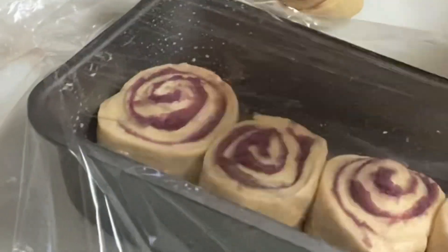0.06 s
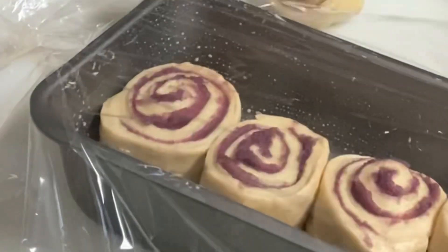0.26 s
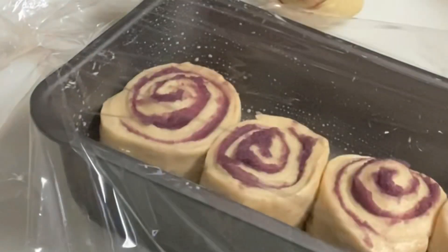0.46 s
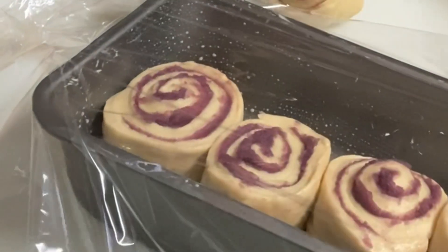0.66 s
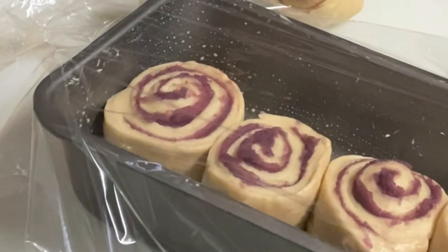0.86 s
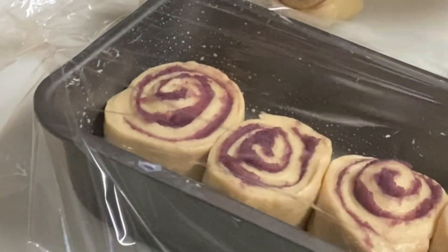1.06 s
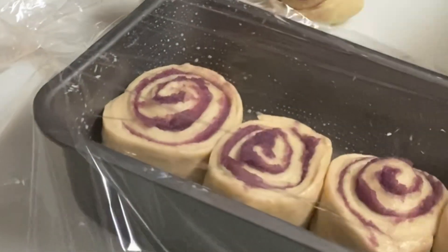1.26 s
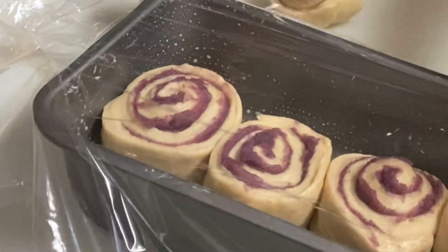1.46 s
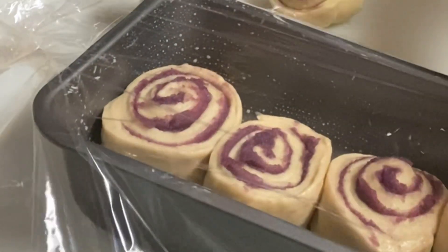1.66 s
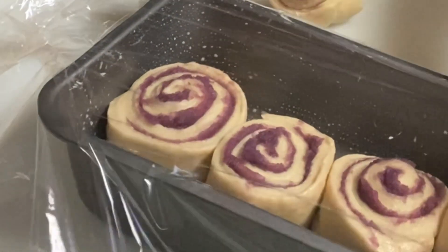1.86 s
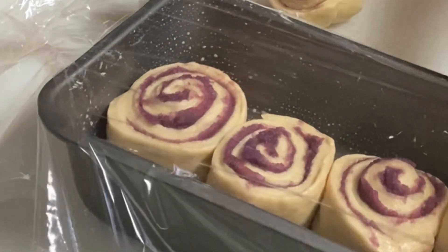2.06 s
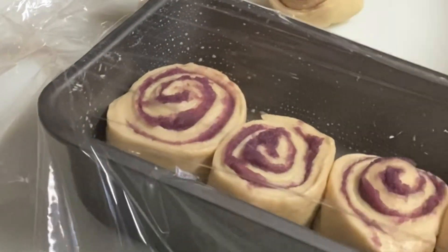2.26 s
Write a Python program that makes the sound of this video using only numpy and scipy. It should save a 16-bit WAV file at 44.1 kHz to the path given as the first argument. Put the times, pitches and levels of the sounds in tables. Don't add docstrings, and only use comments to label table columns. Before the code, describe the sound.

Plastic cling film crinkles over a metal baking pan, heard close in a quiet kitchen. Brisk rustling and rubbing start at once; a hard knock at 0.2 s rings the pan and booms through the counter, with a softer one at 0.3. Rustling swells near 0.6, then a loud, sharp snap at 0.74 rebounds. Sparse ticks follow, with renewed crinkling around 1.7-1.9, over low fridge hum.

```python
import sys
import numpy as np
from scipy import signal
from scipy.fft import rfft, irfft
from scipy.io import wavfile
from scipy.ndimage import uniform_filter1d

SR = 44100
rng = np.random.default_rng(int(sys.argv[2]) if len(sys.argv) > 2 else 0)


def transcribe(u):
    v = np.clip(np.atleast_2d(u).T, -1, 1)
    q = np.round(v * 32767).astype(np.int16)
    wavfile.write(sys.argv[1], SR, q)


def nominal_scale(level):
    x = np.asarray(level, float) / 20
    return 10 ** x


N = 101429

# start_s, length_s, rustle_db, rub_re_rustle_db
STROKES = [(0, 0.018, -60, 1.5), (0.034, 0.045, -59, 0), (0.066, 0.025, -55, 2), (.11, 0.018, -70.5, 11.5),
           (0.146, 0.068, -60.5, -2.5), (0.223, 0.098, -67, 8), (.33, 0.047, -69, 2.5),
           (0.403, 0.092, -76.5, 3), (0.468, 0.092, -67, -1.5), (0.526, 0.078, -67.5, -1),
           (0.578, .03, -63, -2.5), (0.608, 0.027, -58, -1.5), (0.654, 0.15, -58.5, -5),
           (0.771, 0.076, -59.5, -0.5), (.87, 0.068, -65.5, -2), (0.949, 0.12, -74, 1),
           (1.03, 0.072, -70.5, -4.5), (1.109, 0.16, -75, 0), (1.216, 0.022, -70.5, -7.5),
           (1.28, .1, -79, -6), (1.53, 0.014, -73.5, -2.5), (1.669, 0.075, -62, -1.5),
           (1.739, 0.16, -67.5, -4.5), (1.875, 0.088, -69, -3.5), (2.017, 0.04, -74, -7),
           (2.089, 0.022, -73.5, -3), (2.236, 0.048, -69.5, -6.5)]
# freq_hz, density_db_per_hz
FILM_SPECTRUM = [(600, -30), (1500, -7), (2600, -0.5), (5000, -4), (8300, -5), (12500, -8.5),
                 (14300, -10.5), (15600, -30)]
# freq_hz, density_db_per_hz
RUB_SPECTRUM = [(200, -28), (450, -4), (800, 0.5), (1500, -1), (2200, -10.5), (3500, -29)]
# start_s, length_s, level_db,
# pitch_hz
SINGS = [(0, .04, -57, 650), (.727, .012, -54, 3300), (0, .03, -50, 200), (.63, .05, -55, 270),
         (.64, .04, -60, 500), (.198, .012, -58, 900), (0.049, 0.059, -54.5, 775), (.609, .03, -60, 680),
         (.61, .03, -60, 900), (.605, .05, -52, 190), (.745, .06, -49, 200), (.745, .025, -53, 490),
         (.79, .04, -54, 460), (.745, .02, -57, 690), (.037, .012, -60, 1250), (1.685, .05, -67, 650),
         (.22, .035, -47, 550), (0.674, .015, -61, 3000), (0.772, 0.062, -55.5, 1045),
         (0.911, 0.041, -70.5, 1396), (1.208, .02, -58, 620), (1.682, 0.065, -62, 1230),
         (1.698, 0.044, -64, 1530), (1.722, 0.037, -65.5, 4900), (1.685, 0.052, -65, 7500),
         (1.777, 0.022, -70, 1200), (1.877, .012, -55, 660), (1.919, 0.039, -68.5, 400)]
# pitch_hz, rms_db
HUM_LINES = [(26.9, -70), (59.2, -59), (118.4, -56), (242.2, -68.5), (360.7, -103), (479.1, -84),
             (839.8, -91.5)]
# freq_hz, density_db_per_hz
AIR_SPECTRUM = [(20, 4), (45, -6.5), (68, 5.5), (95, -7), (300, -30), (900, -44.5), (2500, -48),
                (14000, -57)]
# start_s, peak_db, pitch_hz
TICKS = [(0.0416, -44.5, 8100), (0.0708, -35.5, 3700), (0.1486, -48, 9000), (0.2097, -28, 4400),
         (0.2564, -42, 3080), (0.3082, -44, 3900), (0.3633, -41, 7900), (0.4704, -53, 7760),
         (0.7407, -17, 3100), (1.0328, -46.5, 8000), (1.0838, -49, 4600), (1.2225, -57, 12000),
         (1.2351, -47, 11500), (1.3092, -46, 9800), (1.3833, -48.5, 3810), (1.4587, -57, 9500),
         (1.5119, -59, 7760), (1.6744, -58, 7630), (1.764, -43.5, 7940), (1.807, -57.5, 8340),
         (1.8233, -39.5, 9000), (1.8514, -49, 8510), (1.879, -42.5, 8600), (1.9207, -42.5, 12400),
         (2.036, -53, 12500), (2.049, -46, 8820), (2.0888, -49, 8610), (2.2108, -55, 8460),
         (2.2443, -48, 3800), (2.279, -46.5, 8700)]
# start_s, peak_db, pitch_hz
MORE_TICKS = [(0.8992, -47, 4500), (0.9487, -66.5, 3480), (1.287, -58, 8340), (1.3324, -51, 3660),
              (1.549, -57, 7330), (1.611, -60, 9000), (1.198, -59, 10500), (1.632, -63, 9000),
              (2.12, -62, 9000), (1.213, -56, 2600), (.757, -38, 3600), (.762, -40, 2000),
              (1.862, -47, 8400), (1.921, -51, 3600), (1.707, -49, 7340), (1.742, -43, 8400),
              (.04, -46, 1300), (1.8986, -50, 8150), (1.9483, -48, 8060), (2.0175, -60, 12130),
              (2.1016, -53, 9500), (2.16, -58, 12300), (2.2254, -61, 12500), (2.239, -55, 3480)]
# start_s, peak_db, counter_boom_db, low_boom_db
KNOCKS = [(0.058, -50, -63, -54), (0.2085, -20.5, -20.5, -28), (0.3065, -31, -32, -34.5),
          (0.364, -48, -39.5, -84), (0.61, -52, -42.5, -64), (0.637, -52, -90, -34.5),
          (0.74, -46, -41, -29.5), (0.773, -52, -56, -37), (0.809, -50, -62, -37),
          (1.208, -51, -44.5, -47.5), (1.24, -52.5, -51, -40.5), (1.873, -52, -43, -50.5)]
# pitch_hz, level_db, t60_s
PAN_MODES = [(250, 1.5, .09), (400, -6, .13), (550, -2, 0.15), (677, -15.5, 0.13), (905, -9, .12),
             (1070, -12, 0.15), (1190, -12, 0.063)]
# centre_hz, level_db, t60_s
THUD_BANDS = [(176, -4, 0.5), (266, -10.5, 0.25), (435, -6, 0.23), (725, -15.5, 0.15), (1060, -12, 0.1),
              (2236, -9, 0.072), (3600, -9.5, 0.11)]
# freq_hz, density_db_per_hz
SNAP_SPECTRUM = [(500, -31), (1000, 1.5), (1700, 8), (3000, 16), (4800, 0.5), (8000, -7), (9400, -13),
                 (14000, -44)]
# pitch_hz, level_db, t60_s
RIM_MODES = [(985, 17.5, 0.026), (1000, 4, 0.23), (1123, 2.5, .12), (1630, 20, .025), (1895, 4, 0.17),
             (2434, -2, 0.14), (3160, 5, .05), (3570, 1.5, .09), (3740, 10, 0.076), (4070, 4.5, .11),
             (4450, 8, 0.055), (4944, 10, .025), (7400, 0.5, 0.037), (8200, 4, .025)]
# low_hz, high_hz
SIDE_GAPS_HZ = [(7650, 8700), (12300, 13600)]

STROKE_ATTACK_S, STROKE_RELEASE_T60_S = .012, .13
GRAINS_PER_S, SMOOTH_SHARE, CLUMP_DB = 4600, 1.4, 1.5
RUSTLE_SIDE_DB, PATCHY_DB = .9, 2
SING_Q, SING_FADE_S, SING_SIDE_DB = 5.1, .007, -4
HUM_WOBBLE_DB, AIR_DB, AIR_APART = 1.5, -54, .49
TICK_T60_S, TICK_TAIL_T60_S, TICK_TAIL_DB = .007, .04, -22
TICK_Q, TICK_WIDE_DB, TICK_TRIM_DB, TICK_DIFFUSE = 2.5, -6, .5, .65
FILM_LAG_S, NEAR_LAG_S, NEAR_BELOW_HZ = -.00014, .00024, 5000
PAN_TRIM_DB, PAN_DAMPING, THUD_DB = -6, .9, -12
PAN_LAG_S, PAN_SPREAD = .0001, .6
BOOM_HZ, BOOM_T60_S, LOW_HZ, LOW_T60_S, SWELL_S = 124.4, .38, 68.93, .23, .011
DAMPED_S, DAMPED_DB = .277, -6
LATE_S_AT_250_HZ = .0115
SNAP_S, SNAP_DB, SNAP_T60_S = .7413, -14, .017
SNAP_TAIL_DB, SNAP_TAIL_T60_S, TAIL_GRAIN_DB = -23.5, .25, 3.5
CREAK_S, CREAK_DB, REBOUND_S, REBOUND_DB = .014, -17, .7725, -24
RIM_DB, CRACK_DB, RIM_LAG_S, SNAP_DIFFUSE = -43.5, -8, -.000175, .45
BASS_LEFT_DB = .8
MID_GAPS_HZ, GAP_LEAK_DB = [(9570, 11290)], -29
CUTOFF_HZ = 16600

TIME_S = np.arange(N) / SR
BINS_HZ = np.arange(N // 2 + 1) * SR / N
MID_TO_PORTS, SIDE_TO_PORTS = np.array([[1], [1]]), np.array([[1], [-1]])


def unit(x):
    return x / np.sqrt(np.mean(x ** 2) + 1e-20)


def butter(x, order, hz, kind="low"):
    return signal.sosfilt(signal.butter(order, hz, kind, fs=SR, output="sos"), x)


def colour(x, points):
    hz, db = np.transpose(points)
    gain_db = np.interp(np.log(BINS_HZ + 1), np.log(hz), db, left=-90)
    return irfft(rfft(x) * nominal_scale(gain_db), N)


def drift(rate_hz):
    r = np.exp(-2 * np.pi * rate_hz / SR)
    wander = signal.lfilter([1], [1, -2 * r, r * r], rng.standard_normal(2 * N))
    return unit(wander[N:])


def decay(t, t60_s):
    return nominal_scale(-60 * t / t60_s)


def dying(start_s, t60_s):
    t = TIME_S - start_s
    return (t >= 0) * decay(np.maximum(t, 0), t60_s)


def ring(x, hz, t60_s):
    r, w = decay(1 / SR, t60_s), 2 * np.pi * hz / SR
    return signal.lfilter([0, np.sin(w)], [1, -2 * r * np.cos(w), r * r], x + 1e-18)


def pair(x, lag_s, diffuse):
    lagged = irfft(rfft(x) * np.exp(-2j * np.pi * BINS_HZ * lag_s), N)
    echoes = rng.standard_normal((2, 2000)) * decay(np.arange(2000), 2000)
    echoes[:, :40] = 0
    echoes /= np.sqrt(np.sum(echoes ** 2) / 2)
    wet = signal.fftconvolve(x[None], echoes, axes=1)[:, :N]
    return np.array([lagged, x]) + diffuse * wet


def patchy(x):
    position = np.clip(np.log2((BINS_HZ + 1) / 500) / .7, 0, 7)
    spectrum, out = rfft(x), 0
    for k in range(8):
        band = irfft(spectrum * np.clip(1 - abs(position - k), 0, 1), N)
        out = out + nominal_scale(PATCHY_DB * drift(9.5)) * band
    return out


def rustle():
    film_power, rub_power = 0, 0
    for start_s, length_s, db, rub_db in STROKES:
        attack = np.clip((TIME_S - start_s) / STROKE_ATTACK_S, 0, 1)
        release = decay(np.maximum(TIME_S - start_s - length_s, 0), STROKE_RELEASE_T60_S)
        film_power = film_power + (nominal_scale(db) * attack * release) ** 2
        rub_power = rub_power + (nominal_scale(db + rub_db) * attack * release) ** 2
    grains = unit((rng.random(N) < GRAINS_PER_S / SR) * 1.)
    grain_level = uniform_filter1d(grains, size=9) * 3 + SMOOTH_SHARE
    clump = nominal_scale(CLUMP_DB * drift(39.0))
    film = unit(clump * colour(grain_level * rng.standard_normal((2, N)), FILM_SPECTRUM))
    rub = unit(clump * colour(rng.standard_normal((2, N)), RUB_SPECTRUM))
    mid, side = patchy(np.sqrt(film_power) * film + np.sqrt(rub_power) * rub)
    return mid + nominal_scale(RUSTLE_SIDE_DB) * side * SIDE_TO_PORTS


def sings():
    out = np.zeros((2, N))
    noise = rng.standard_normal((2, N)) * nominal_scale(2.6 * drift(60.))
    for start_s, length_s, db, hz in SINGS:
        span = slice(int(start_s * SR), int((start_s + length_s + 3 * SING_FADE_S) * SR) + 1)
        t = np.arange(span.stop - span.start) / SR
        b, a = signal.iirpeak(hz, SING_Q, SR)
        once = signal.lfilter(b, a, noise[:, span])
        mid, side = unit(signal.lfilter(b, a, once))
        fade_out_s = (length_s - t) / 3 + SING_FADE_S
        shape = np.clip(np.minimum(t, fade_out_s) / SING_FADE_S, 0, 1)
        out[:, span] += nominal_scale(db) * shape * (mid + nominal_scale(SING_SIDE_DB) * side * SIDE_TO_PORTS)
    return out


def fridge():
    lines = 0
    for hz, db in HUM_LINES:
        level = np.sqrt(2) * nominal_scale(db + HUM_WOBBLE_DB * drift(6.5))
        lines = lines + level * np.sin(2 * np.pi * hz * TIME_S + .84 * drift(4.75))
    air = unit(colour(rng.standard_normal((2, N)), AIR_SPECTRUM))
    mid, side = butter(air, 8, 14300)
    side = butter(side, 2, 250, "high")
    return lines + nominal_scale(AIR_DB) * (mid + AIR_APART * side * SIDE_TO_PORTS)


def ticks():
    size = 4000
    out, t = np.zeros((2, N + size)), np.arange(size) / SR
    envelope = decay(t, TICK_T60_S) + nominal_scale(TICK_TAIL_DB) * decay(t, TICK_TAIL_T60_S)
    for start_s, db, hz in list(TICKS) + list(MORE_TICKS):
        if abs(start_s - SNAP_S) <= .004:
            continue
        burst = rng.standard_normal(size) * envelope
        crack = butter(burst, 2, .7 * hz, "high")
        tick = signal.lfilter(*signal.iirpeak(hz, TICK_Q, SR), burst) + nominal_scale(TICK_WIDE_DB) * crack
        row, at = int(hz < NEAR_BELOW_HZ), int(start_s * SR)
        out[row, at:at + size] += nominal_scale(db + TICK_TRIM_DB) * tick / np.abs(tick).max()
    far, near = out[:, :N]
    far = nominal_scale([[-.5], [.5]]) * pair(far, FILM_LAG_S, TICK_DIFFUSE)
    near = nominal_scale([[-1], [1]]) * pair(near, NEAR_LAG_S, TICK_DIFFUSE)
    return far + near


def late(hz):
    return LATE_S_AT_250_HZ * np.sqrt(250 / hz)


def pan_rings(start_s, db):
    out, at = np.zeros(N), (start_s * SR).astype(int)
    for hz, level_db, t60_s in PAN_MODES:
        clicks = np.zeros(N)
        uneven_db = 1.5 * rng.standard_normal(len(start_s))
        clicks[at + int(late(hz) * SR)] = nominal_scale(db + level_db + PAN_TRIM_DB + uneven_db)
        out += ring(clicks, hz, PAN_DAMPING * t60_s)
    return out


def thuds(start_s, db):
    out = np.zeros(N)
    for hz, level_db, t60_s in THUD_BANDS:
        band = unit(butter(rng.standard_normal(N), 2, [hz / 1.29, hz * 1.29], "band"))
        kicks = np.zeros(N)
        kicks[((start_s + late(hz)) * SR).astype(int)] = nominal_scale(db + level_db + THUD_DB)
        out += band * signal.lfilter([1], [1, -decay(1 / SR, t60_s)], kicks + 1e-18)
    return out


def counter_boom(start_s, hz, t60_s, levels_db):
    envelope = np.zeros(N)
    for s, db in zip(start_s, levels_db):
        damping = nominal_scale(DAMPED_DB * (s < DAMPED_S) * (TIME_S > DAMPED_S))
        envelope += nominal_scale(db) * dying(s + late(hz) - SWELL_S / 2, t60_s) * damping
    r = np.exp(-1 / (SWELL_S * SR))
    swell = signal.lfilter([1 - r], [1, -r], envelope)
    return swell * np.sin(2 * np.pi * hz * TIME_S + .5 * drift(9.87))


def knocks():
    start_s, db, boom_db, low_db = np.transpose(KNOCKS)
    pan = pan_rings(start_s, db) + thuds(start_s, db)
    boom = counter_boom(start_s, BOOM_HZ, BOOM_T60_S, boom_db)
    return pan, boom + counter_boom(start_s, LOW_HZ, LOW_T60_S, low_db)


def snap():
    click = np.zeros(N)
    click[int(SNAP_S * SR)] = 1
    click[int(REBOUND_S * SR)] = nominal_scale(REBOUND_DB + 9.5)
    rings = sum(nominal_scale(RIM_DB + db) * ring(click, hz, t60_s) for hz, db, t60_s in RIM_MODES)
    crack = butter(np.roll(click, 20) - np.roll(click, 32), 2, [1000, 6000], "band")
    rings = butter(rings + nominal_scale(CRACK_DB) * crack, 2, 800, "high")
    rise = np.clip(1 - (SNAP_S - TIME_S) / CREAK_S, 0, 1) * (TIME_S < SNAP_S)
    creak = (nominal_scale(CREAK_DB) * rise) ** 2
    tail = nominal_scale(SNAP_TAIL_DB + TAIL_GRAIN_DB * drift(150.)) * dying(SNAP_S, SNAP_TAIL_T60_S)
    rebound = nominal_scale(REBOUND_DB) * dying(REBOUND_S, SNAP_T60_S)
    noise = unit(colour(rng.standard_normal(N), SNAP_SPECTRUM))
    return nominal_scale(SNAP_DB) * noise * (creak + dying(SNAP_S, SNAP_T60_S) + rebound + tail) + rings


def deaf(x, gaps_hz):
    inside = sum((BINS_HZ > low) & (BINS_HZ < high) for low, high in gaps_hz)
    return irfft(rfft(x) * np.where(inside, nominal_scale(GAP_LEAK_DB), 1), N)


def scene():
    film = rustle() + sings()
    pan, boom = knocks()
    bass = (boom + fridge()) * nominal_scale([[BASS_LEFT_DB], [-BASS_LEFT_DB]])
    struck = pair(pan, PAN_LAG_S, PAN_SPREAD) + pair(snap(), RIM_LAG_S, SNAP_DIFFUSE)
    left, right = film + struck + bass
    mid = deaf((left + right) / 2, MID_GAPS_HZ)
    side = deaf((left - right) / 2, SIDE_GAPS_HZ)
    return mid * MID_TO_PORTS + side * SIDE_TO_PORTS + ticks()


def band_limit(x):
    return signal.sosfilt(signal.butter(12, 16400, fs=SR, output="sos"), x)


def record(dry):
    lowpass = signal.cheby2(10, 60, CUTOFF_HZ, fs=SR, output="sos")
    mix = signal.sosfilt(lowpass, dry)
    return band_limit(mix)


dry = scene()
out = record(dry)
transcribe(out)
```